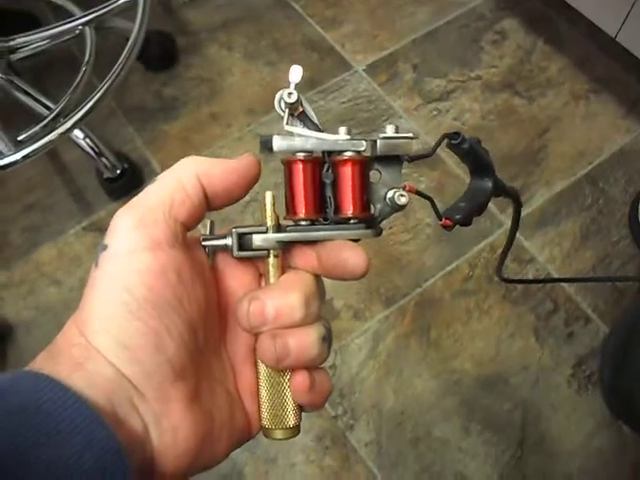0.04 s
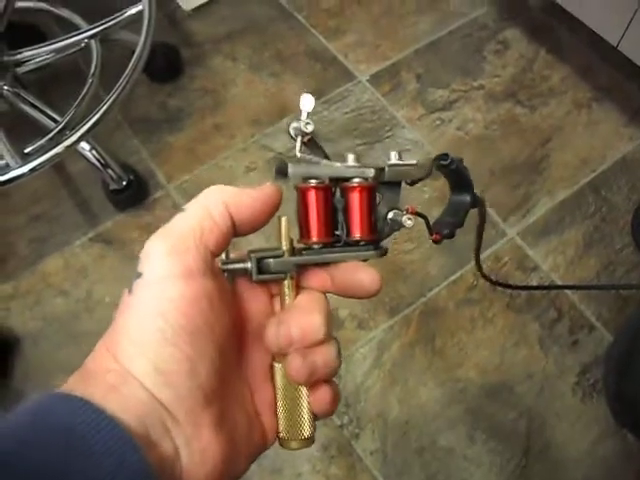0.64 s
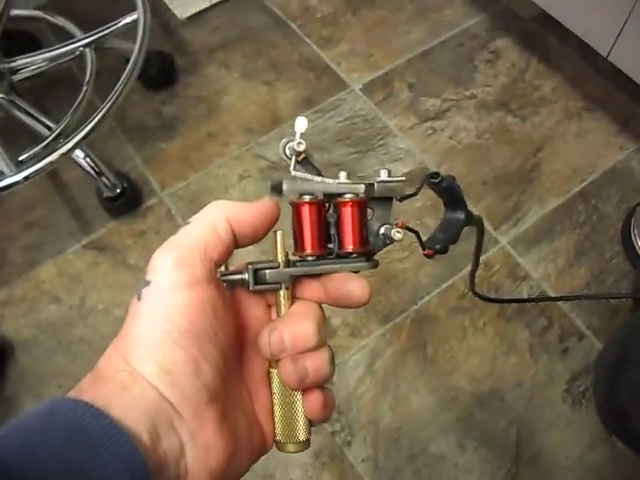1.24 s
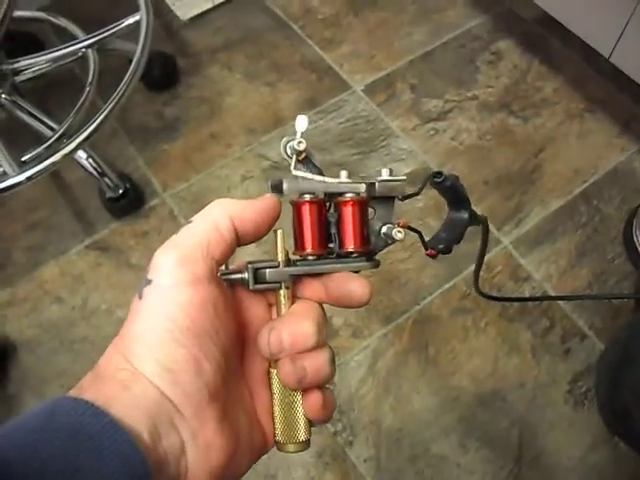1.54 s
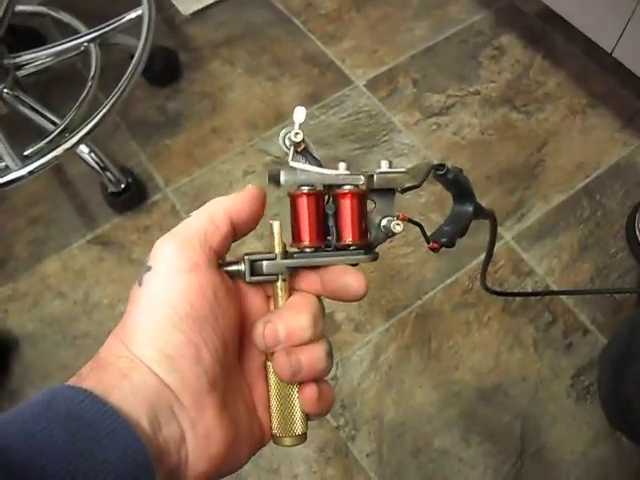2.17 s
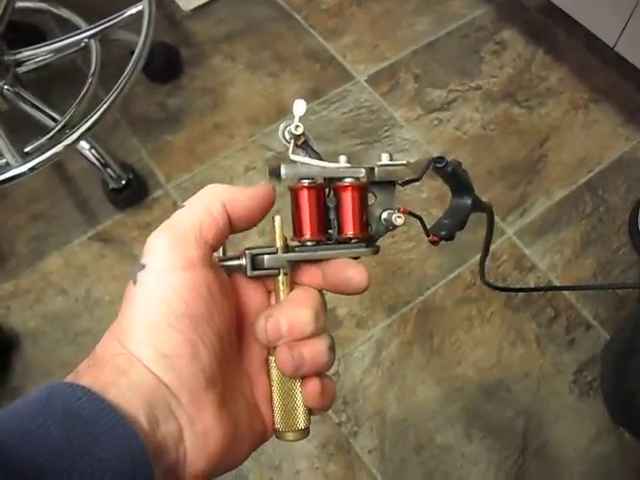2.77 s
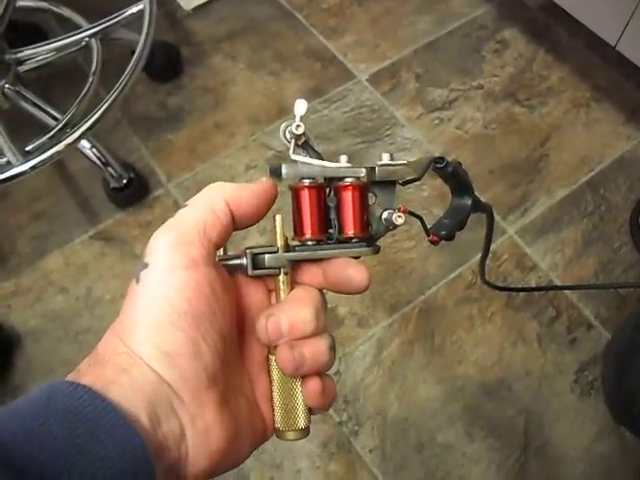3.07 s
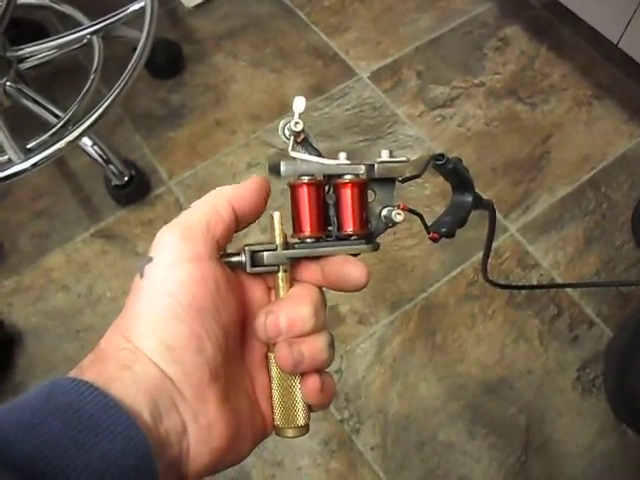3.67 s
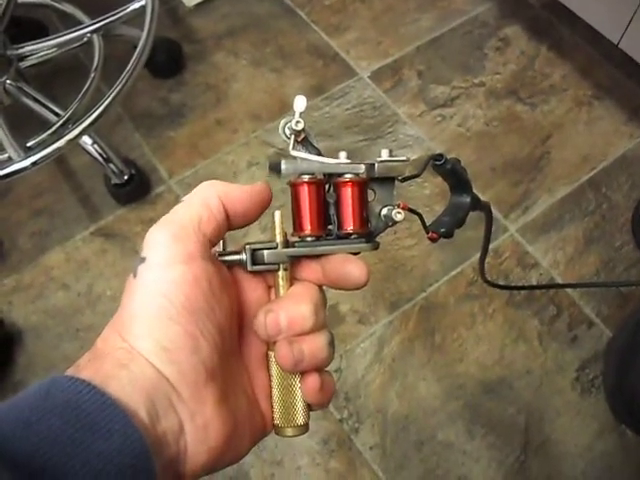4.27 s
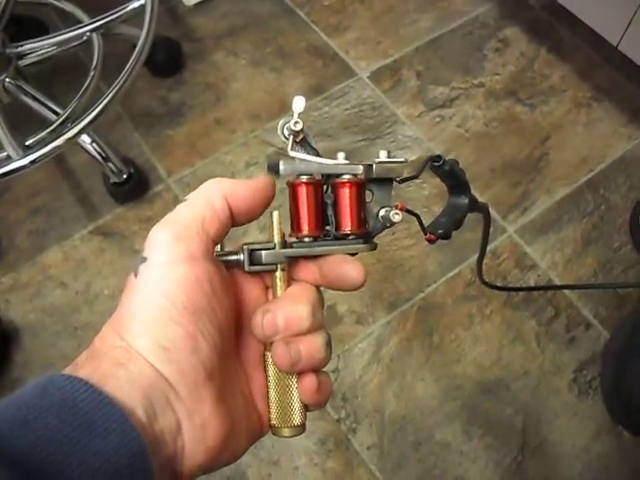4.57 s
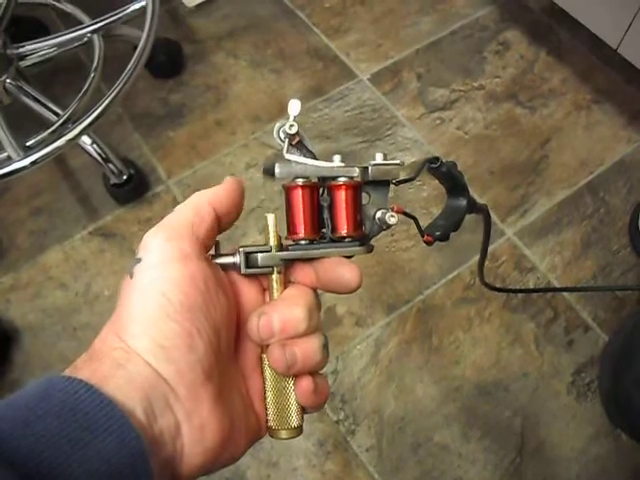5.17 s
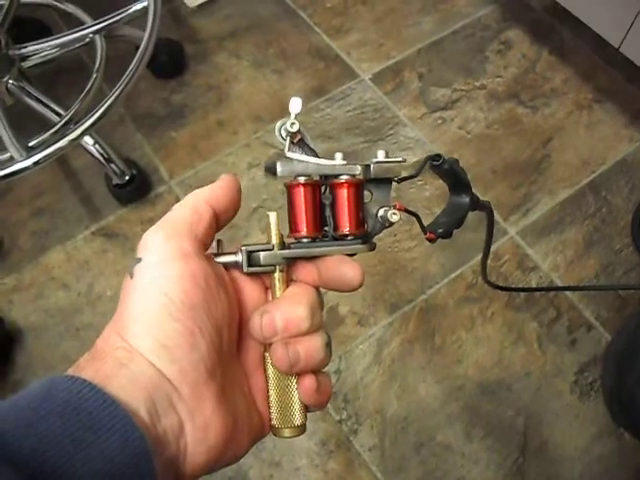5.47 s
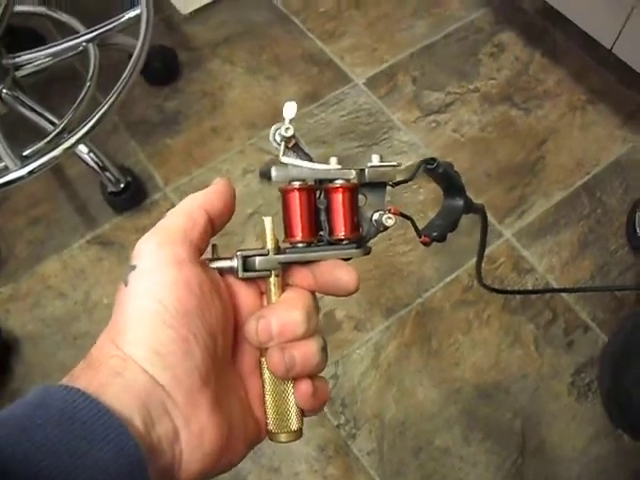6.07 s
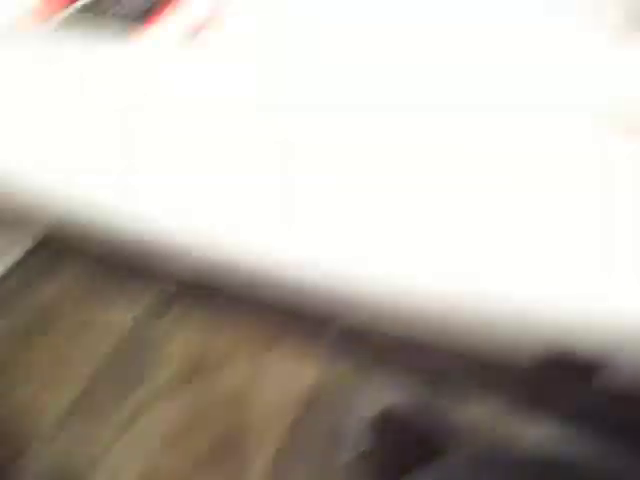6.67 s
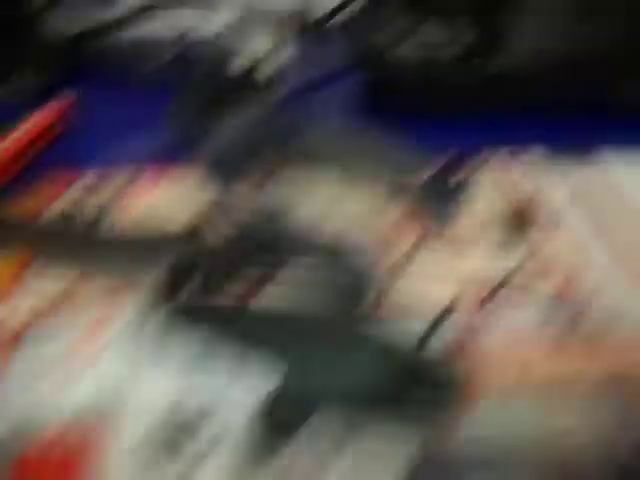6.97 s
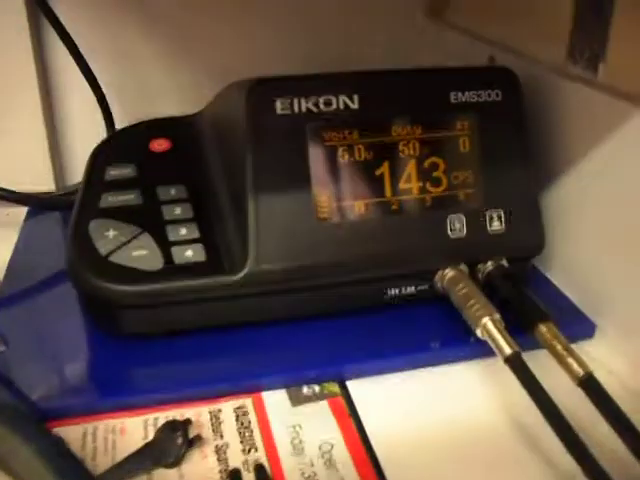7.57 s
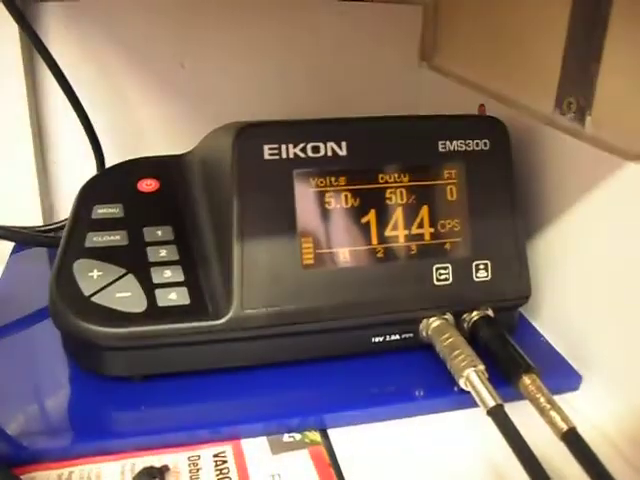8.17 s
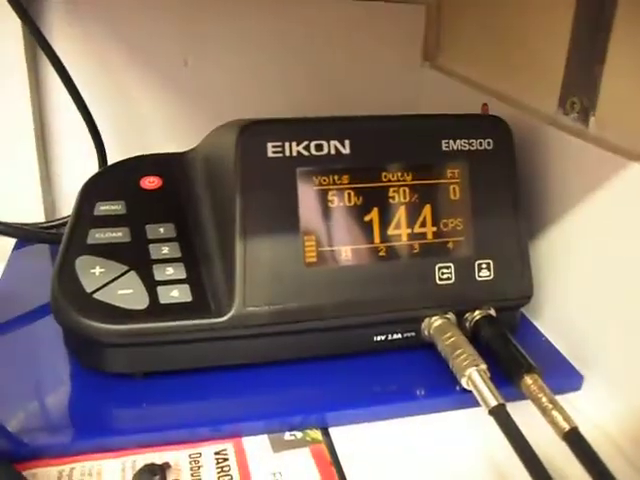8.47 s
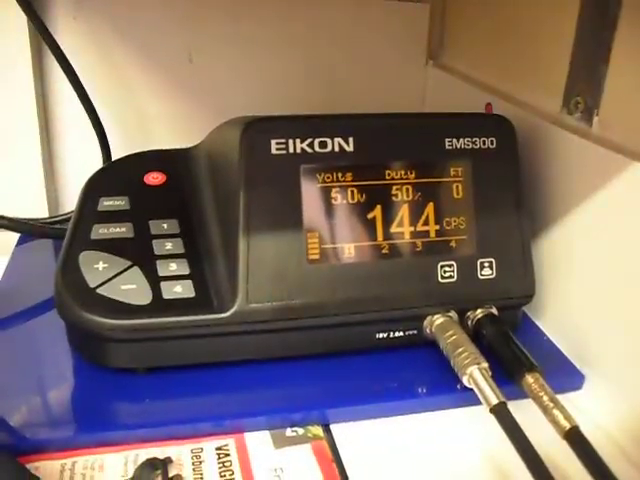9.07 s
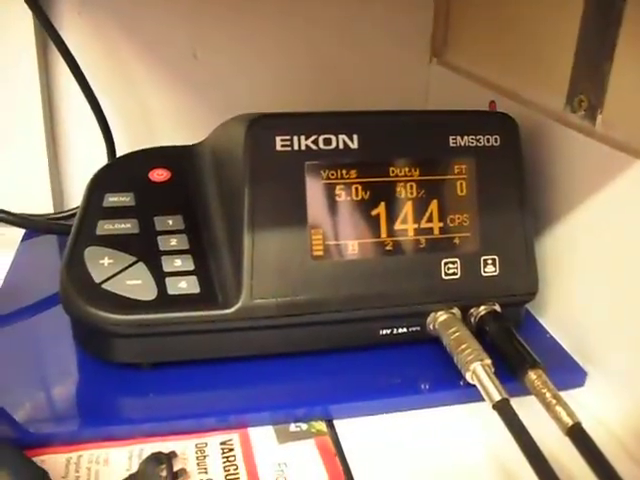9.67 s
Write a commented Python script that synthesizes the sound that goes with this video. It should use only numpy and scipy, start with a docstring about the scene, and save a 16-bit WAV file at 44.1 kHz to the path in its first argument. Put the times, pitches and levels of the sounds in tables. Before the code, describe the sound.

A coil tattoo machine buzzes close to the microphone from the start, a bright, metallic rasp of steady pitch over a soft hum, with a few tiny sputters in the first second. Three times a thumb presses on its moving bar: the buzz weakens, dips slightly in pitch and shrinks to a faint, rapid ticking, from about 1.7 to 2.1 seconds, 3.3 to 3.6 seconds and 4.8 to 5.1 seconds. Each time it snaps straight back to full strength. From about 6.3 to 7.3 seconds the microphone swings a short way off, and the tone shifts and flutters. The buzz then carries on, a little softer and less sharp, with slight sputters between 7.6 and 8.4 seconds, until the end at nearly 10 seconds. The room is small and quiet, with little echo and a faint ventilation rumble.

```python
"""In a small, quiet room, a hand-held coil tattoo machine buzzes. Its armature bar hits the coil cores
about 144 times a second; each impact excites the steel frame's resonances, and the swinging mass hums.
Three times a thumb presses on the bar, which slows until only its spring ticks on the contact screw.
Then the microphone swings away to a shelf, through shifting echoes. Ventilation rumbles underneath."""
import sys
import numpy as np
from scipy import signal
from scipy.fft import rfft, irfft, next_fast_len
from scipy.io import wavfile
from scipy.ndimage import uniform_filter1d, map_coordinates

SR = 44100
rng = np.random.default_rng(int(sys.argv[2]) if len(sys.argv) > 2 else 0)


def store_pcm(level_fs):
    """Save levels as 16-bit WAV."""
    pcm = np.round(np.clip(level_fs, -1, 1) * 32767).astype(np.int16)
    wavfile.write(sys.argv[1], SR, np.atleast_2d(pcm).T)


N = 433062

# Stroke rate of the free bar, one list for each run between presses: t/s, f/Hz
FREE_RATE = [
    [(0.0, 144.4), (0.612, 143.8), (0.646, 144.2), (1.53, 144.2)],
    [(2.15, 144.2), (2.17, 143.9), (3.05, 144.2)],
    [(3.7, 144.2), (4.58, 144.2)],
    [(5.1, 144.2), (6.64, 144.1), (9.8, 144.5)],
]
# Base level of the buzz in the same runs: t/s, strike level/dB, treble level/dB
FREE_LEVEL = [
    [(0.03, -40, -47), (0.39, -41, -47), (0.896, -38, -45), (1.054, -37, -48), (1.52, -39, -47)],
    [(2.15, -40, -46), (2.276, -38, -48), (2.606, -40, -45), (3.05, -40, -45)],
    [(3.7, -41, -44), (4.58, -40, -45)],
    [(5.1, -40, -45), (5.19, -41, -45), (6.19, -39, -46), (6.57, -43, -49), (7.34, -42, -55),
     (9.8, -42, -54)],
]
# Thumb presses: touch t/s, lean t/s, stall t/s, release t/s, held stroke f/Hz, treble flutter level/dB
PRESSES = [(1.54, 1.705, 1.819, 2.09, 140.8, 12), (3.06, 3.255, 3.377, 3.641, 138.9, 0),
           (4.59, 4.805, 4.876, 5.051, 140.5, 8)]
# Sputters of the contact: t/s, half length/s, roughness/1
SPUTTERS = [(.28, .025, .2), (.42, 0.044, .3), (.55, .03, 0.3), (.75, .025, 0.28), (6.15, .03, .2),
            (7.62, .06, 0.22), (7.88, .035, .5), (7.98, .02, .4), (8.33, .05, 0.64)]
# Microphone path: t/s, distance moved/m, place/1 (0 first, 1 tilted, 2 settled grip, 3 swing, 4 shelf)
MIC_PATH = [(0, 0.02, 0), (.24, .002, 0), (.55, 0.087, 0.43), (.8, .14, 1), (1.7, .15, 1.24),
            (2.7, 0.15, 2), (6.1, 0.13, 2), (6.3, 0.16, 2.03), (6.5, 0.3, 2.5), (6.7, 0.43, 3.5),
            (6.9, 0.598, 3.5), (7.2, 0.74, 4), (7.5, 0.76, 4), (9.82, .785, 4)]
# Spectra that the frame radiates to those five places: f/Hz, relative level/dB
FIRST_TONE = [(2250, -47), (2450, -23), (3050, -4), (3400, -19.5), (4000, -19.5), (4800, -7), (5350, 1),
              (5900, -19), (7000, -10), (8000, -21), (9300, -26), (10400, -33), (11100, -30), (12100, -55)]
TILTED_TONE = [(2250, -49.5), (2450, -17), (3100, -23.5), (3900, -17.5), (4700, -6), (5350, -1),
               (5900, -7.5), (7100, -15), (8300, -11), (10400, -19.5), (11100, -30), (12100, -38)]
HELD_TONE = [(2250, -49), (2450, -12.5), (2750, -14.5), (3100, -12), (3350, -16.5), (3950, -11), (4750, -4),
             (5350, 0), (5900, -5.5), (7050, -12), (7950, -7), (9300, -14), (10400, -16.5), (12100, -38)]
SWING_TONE = [(1500, -36), (1900, -16), (2500, -12.5), (3000, -3.5), (3500, -11), (4100, -7.5),
              (4800, -1.5), (5400, -3.5), (6000, -13), (7000, -11), (9500, -17), (10500, -19), (12100, -39)]
SHELF_TONE = [(2250, -49), (2450, -23), (3050, -10), (3650, -18), (4100, -13.5), (4850, -0.5),
              (5300, -16.5), (5950, -26), (6500, -18), (7600, -22.5), (8450, -17.5), (9000, -23.5),
              (10300, -24.5), (11100, -37), (12100, -51)]
# Spectra of the frame under the thumb and of the spring on the screw: f/Hz, relative level/dB
LEANING_TONE = [(2250, -46), (2700, -18), (3050, -16), (3500, -16.5), (4700, -3), (5350, -1), (6000, -12),
                (6700, -6.5), (7200, -15), (8300, -10.5), (10400, -13), (12100, -36)]
SPRING_TONE = [(2200, -28), (3000, -11.5), (3750, 3.5), (4400, -2.5), (5300, -8.5), (6300, -7), (7500, -14),
               (8200, 0), (8800, -9), (9600, -22), (11000, -42), (12500, -57)]
# Rebounds and near reflections after each strike: delay/ms, gain/1
FIRST_ECHO = [(0.487, 0.75), (1.162, -0.22), (2.15, 0.51), (2.249, 0.36), (3.271, -0.17), (4.55, 0.29)]
HELD_ECHO = [(0.821, -0.14), (0.945, 0.051), (1.286, 0.21), (1.451, -0.12), (1.733, 0.16), (2.048, 0.16),
             (2.266, 0.29), (2.44, -0.19)]
SHELF_ECHO = [(0.957, 0.19), (1.688, 0.43), (1.951, -0.29), (3.002, -0.34), (3.335, -0.21), (4.103, 0.12),
              (4.254, -0.2), (4.458, 0.11)]
# How far the frame's bending waves fall out of step: f/Hz, phase spread/rad
PHASE_SPREAD = [(2400, 0.85), (4000, 0.67), (5400, 0.44), (6500, .62), (8000, 1.45), (9800, 1.3),
                (11000, .2)]
# Hum of the swinging bar and frame: harmonic number/1, relative level/dB
HELD_HUM = [(1, -15.5), (2, 0.5), (3, -11.5), (4, -11), (5, -8.5), (6, -11.5), (7, 1), (8, -14.5), (9, 2),
            (10, -12), (11, -8), (12, -4), (13, -12), (14, -1), (15, 1), (16, -4.5)]
SHELF_HUM = [(1, -11), (2, -13), (3, -15.5), (4, -19.5), (5, -15), (6, -1), (7, -4), (8, -8.5), (9, -16),
             (10, -1), (11, -8), (12, -28), (13, -13), (14, -2.5), (15, -0.5), (16, 2.5)]
PRESSED_HUM = [(1, -2), (2, -1.5), (7, -11), (8, -8.5), (10, -9), (13, -7), (14, -5), (15, -7)]
# Reverberation time of the room: f/Hz, T60/s
ROOM_T60 = [(300, 0.23), (3000, 0.26), (6000, 0.32), (12000, 0.094)]
# Noise spectrum of the room: f/Hz, relative level/dB
ROOM_NOISE = [(12, -15.5), (27, 0.5), (40, -13.5), (70, -13), (120, -18.5), (250, -22.5), (500, -26),
              (1000, -28), (2000, -31), (5000, -31.5), (10000, -35), (12500, -58)]

TOUCH_S, LEAN_S, STALL_S, RELEASE_S = .1, .055, .028, .021  # how long each stage of a press takes to come in
SETTLE_AFTER_S, SETTLE_S, LIFT_S = .05, .045, .032  # the stalled bar settles, then stirs before release
TOUCH_DB, LEAN_DB, STALL_DB, SETTLE_DB = -1.5, -4.5, -14.5, -12  # what each stage takes from the strike
TOUCH_TREBLE_DB, LEAN_TREBLE_DB, SETTLE_TREBLE_DB = -1.8, -8.5, -13
FLUTTER_AT, FLUTTER_WIDTH = .7, .2  # the spring's swell: centre and half width as shares of the stall
FLUTTER_STRIKE = .65  # share of the flutter level that enters the strike band
GRIP_HZ = .35  # a light touch stiffens the spring and speeds the bar
DRAG_S, DRAG_HZ = .11, 4.5  # the leaning thumb slows the bar this fast and this far
STUMBLE_AFTER_S, STUMBLE_S, STUMBLE_HZ = .035, .035, 5.2  # further dip once the bar misses the cores
FLARE_DB, FLARE_S = 2.2, .025  # the bar strikes harder as the thumb begins to lean
WANDER_PER_S, WANDER_HZ, WANDER_DB = 10, .04, .12  # the contact is never quite even
SPUTTER_SAG_HZ = 1.2  # stroke rate lost at full roughness
STRIKE_GAIN_DB, SHELF_TREBLE_DB = .1, 1.5
RIPPLE_DB, RIPPLE_M = .7, .018  # standing waves: depth, spacing
SOUND_SPEED_M_S, TOP_HZ = 343, 12500


def armature(cycles, thumb, place):
    """Impact excitation: the bar's blows on the cores ring the frame; a stall leaves only the spring."""
    rough = np.clip(0.33 * thumb + sputtering(), 0, 1)
    even = blows(cycles, jitter_us=0.97, scatter_db=0.25)
    uneven = blows(cycles, jitter_us=25, scatter_db=0.5)
    strikes = dispersed((1 - rough) * even + rough * uneven, lead_ms=0.23)
    views = [(FIRST_TONE, FIRST_ECHO), (TILTED_TONE, HELD_ECHO), (HELD_TONE, HELD_ECHO),
             (SWING_TONE, HELD_ECHO), (SHELF_TONE, SHELF_ECHO)]
    free = sum(share * unit(ring(strikes, *view)) for share, view in zip(shares(place), views))
    loaded = unit(ring(strikes, LEANING_TONE, HELD_ECHO)) - bar_ring(strikes, thumb)
    leaning = np.clip(1.1 * thumb, 0, 1)
    clack = (1 - leaning) * free + leaning * loaded
    stalled = thumb ** 4
    return (1 - stalled) * clack + stalled * spring_tick(strikes, cycles)


def drive():
    """Damping of a driven oscillator: the thumb touches, leans on, stalls and releases the bar."""
    rate, = curves(np.concatenate(FREE_RATE))
    strike_db, treble_db = curves(np.concatenate(FREE_LEVEL))
    force_db = WANDER_DB * wobble(WANDER_PER_S)
    rate = rate + WANDER_HZ * wobble(WANDER_PER_S) - SPUTTER_SAG_HZ * sputtering() ** 2
    strike_db += STRIKE_GAIN_DB + force_db
    treble_db += force_db
    thumb = np.zeros(N)
    for touch_s, lean_s, stall_s, release_s, held_hz, flutter_db in PRESSES:
        held = (1 - ramp(release_s - RELEASE_S * 2 / 3, RELEASE_S)) ** 2
        touch = held * ramp(touch_s, TOUCH_S)
        lean = held * ramp(lean_s, LEAN_S)
        drag = held * ramp(lean_s, DRAG_S)
        stall = held * ramp(stall_s, STALL_S)
        settle = ramp(stall_s + SETTLE_AFTER_S, SETTLE_S) * (1 - ramp(release_s - LIFT_S, LIFT_S))
        length = release_s - stall_s
        flutter = flutter_db * swell(stall_s + FLUTTER_AT * length, FLUTTER_WIDTH * length)
        stumble = STUMBLE_HZ * swell(stall_s + STUMBLE_AFTER_S, STUMBLE_S)
        rate = (1 - stall) * (rate + GRIP_HZ * touch - DRAG_HZ * drag) + stall * (held_hz - stumble)
        thumb += (1 - stall) * (.05 * touch + .3 * lean + .3 * drag) + .98 * stall
        strike_db += TOUCH_DB * touch + LEAN_DB * lean + STALL_DB * stall + SETTLE_DB * settle
        strike_db += FLUTTER_STRIKE * flutter + FLARE_DB * swell(lean_s, FLARE_S)
        treble_db += TOUCH_TREBLE_DB * touch + LEAN_TREBLE_DB * drag + SETTLE_TREBLE_DB * settle + flutter
    return rate, np.clip(thumb, 0, 1), strike_db, treble_db


def strokes(rate):
    """Phase, in strokes, is the integral of rate; the bar starts a fresh cycle at each release."""
    cycles = np.cumsum(rate) / SR
    for _, _, _, release_s, _, _ in PRESSES:
        lag = (cycles[round(release_s * SR)] + .5) % 1 - .5
        cycles = cycles - lag * ramp(release_s - LIFT_S, LIFT_S)
    return cycles


def sputtering():
    """Intermittent contact: how unevenly the circuit closes, from 0 to 1."""
    return sum(size * swell(s, half) for s, half, size in SPUTTERS)


def blows(cycles, jitter_us, scatter_db):
    """A quasi-periodic impulse train: scatter in time and force puts noise between the harmonics."""
    at = np.interp(np.arange(1, int(cycles[-1])), cycles, np.arange(N))
    chance = rng.standard_normal((len(at), 2))
    at = at + chance[:, 0] * jitter_us * SR / 1e6
    taps = at.astype(int)[:, None] + np.arange(-7, 9)
    offset = taps - at[:, None]
    pulses = np.sinc(offset) * np.sinc(offset / 8)  # a windowed sinc can fall between samples
    force = amp(scatter_db * chance[:, 1:])
    return np.bincount(taps.ravel(), (pulses * force).ravel(), N)[:N]


def dispersed(x, lead_ms):
    """Dispersion of bending waves: treble arrives first, and scattering in the frame draws it out."""
    def response(hz):
        knots = rng.standard_normal(SR // 300 + 4)
        scatter = map_coordinates(knots, [hz / 170])
        chirp = np.pi * lead_ms / 1000 * (hz - 5000) ** 2 / 5000
        return np.exp(1j * (chirp + along(PHASE_SPREAD, hz) * scatter))
    return filtered(x, response)


def ring(x, tone, echoes=(), size=4096):
    """Resonance: x excites a minimum-phase body with this spectrum, followed by short echoes."""
    hz = np.fft.rfftfreq(size, 1 / SR)
    cepstrum = irfft(np.log(amp(along(tone, hz))))
    cepstrum[1:size // 2] *= 2  # folding the cepstrum makes the response causal
    cepstrum[size // 2 + 1:] = 0
    paths = 1 + sum(gain * np.exp(-2j * np.pi * hz * ms / 1000) for ms, gain in echoes)
    impulse_response = irfft(np.exp(rfft(cepstrum)) * paths)[:size // 2]
    return signal.oaconvolve(x, impulse_response)[:N]


def bar_ring(strikes, thumb, light_hz=3350, loaded_hz=2950, q=14):
    """Mass loading: under the thumb the bar's resonance gives way to a lower one."""
    load = np.clip((thumb - .25) / .4, 0, 1)
    light, heavy = (unit(signal.lfilter(*signal.iirpeak(hz, q, fs=SR), strikes))
                    for hz in (light_hz, loaded_hz))
    return amp(-13) * ((1 - load) * light + load * heavy)


def spring_tick(strikes, cycles):
    """Impact and friction: the front spring ticks and scrapes on the contact screw once a cycle."""
    scrape = rng.standard_normal(N) * (1 + np.cos(2 * np.pi * cycles))
    return unit(ring(unit(strikes) + 0.26 * unit(scrape), SPRING_TONE, HELD_ECHO))


def at_levels(x, strike_db, treble_db, crossover_hz=7000):
    """Amplitude envelopes: the main ring and its treble are each levelled, then given their own level."""
    def steady(band):
        power = uniform_filter1d(uniform_filter1d(band * band, size=612), size=612)  # about two strokes
        return band / np.sqrt(np.abs(power) + 1e-12)
    low = filtered(x, lambda hz: 1 / (1 + (hz / crossover_hz) ** 24))
    return amp(strike_db) * steady(low) + amp(treble_db) * steady(x - low)


def hum(cycles, thumb, place, lag_s=.018):
    """Forced vibration: the swinging mass shakes the frame at harmonics of the stroke rate."""
    def harmonics(orders, size=4096):
        turn = np.arange(size) / size
        wave = unit(sum(amp(db) * np.sin(2 * np.pi * (round(k) * turn + rng.random()))
                        for k, db in orders))
        return wave[(cycles * size).astype(int) % size]
    pole = np.exp(-1 / (lag_s * SR))
    thumb = signal.lfilter([1 - pole], [1, -pole], thumb)  # the low swing lags behind the thumb
    away = np.clip((place - 2) / 1.85, 0, 1)
    held = np.sqrt(1 - away) * amp(-58.0) * harmonics(HELD_HUM)
    shelf = np.sqrt(away) * amp(-64.5) * harmonics(SHELF_HUM)
    pressed = np.clip(14 * thumb, 0, 1) * amp(-67.5) * harmonics(PRESSED_HUM)
    return (1 - thumb) * (held + shelf) + pressed


def knocks(mode_hz=1015, rise_s=.008, t60_s=.16):
    """Damped free vibration: the first stroke after each press kicks the frame's low mode."""
    t = np.arange(SR // 4) / SR
    envelope = amp(-56 - 60 * t / t60_s) * (1 - np.exp(-t / rise_s))
    knock = envelope * np.sin(2 * np.pi * mode_hz * t)
    out = np.zeros(N)
    for _, _, _, release_s, _, _ in PRESSES:
        out[round(release_s * SR):][:len(t)] += knock
    return out


def reflections(x, metres, count=8):
    """Interference: echo paths off floor and furniture change with movement, so the overtones flutter."""
    out = np.zeros(N)
    fine = signal.resample_poly(x, up=4, down=1)
    grid = np.linspace(0, N, len(fine), endpoint=False)
    for slant, delay_s in zip(np.linspace(-1, 1, count), rng.uniform(.006, .02, count)):
        emitted = np.arange(N) - SR * (delay_s + slant * metres / SOUND_SPEED_M_S)
        out += np.interp(emitted, grid, fine)
    return out / np.sqrt(count)


def reverberation(x):
    """Absorption: the room's diffuse field decays exponentially, the highest treble first."""
    hz, t, spectra = signal.stft(rng.standard_normal(SR // 2), SR, nperseg=256)
    decay = amp(-60 * t / along(ROOM_T60, hz)[:, None])
    tail = signal.istft(spectra * decay, SR, nperseg=256)[1]
    return signal.oaconvolve(x, tail / np.linalg.norm(tail))[:N]


def room_tone(drone_hz=52):
    """Broadband and narrowband noise: ventilation rumble, faint hiss and a low drone."""
    air = unit(filtered(rng.standard_normal(N), lambda hz: amp(along(ROOM_NOISE, hz))))
    drone = unit(filtered(rng.standard_normal(N), lambda hz: 1 / (1 + ((hz - drone_hz) / 4) ** 2)))
    return amp(-62.5) * air + amp(-69.5) * drone


def amp(db):
    """Amplitude ratio of a level in decibels."""
    return 10 ** (np.asarray(db) / 20)


def unit(x):
    """Normalisation to rms 1."""
    return x / np.sqrt(np.mean(x ** 2) + 1e-20)


def along(points, hz):
    """Interpolation of (f/Hz, value) points on a logarithmic frequency axis."""
    f, v = np.transpose(points)
    return np.interp(np.log(hz + 1), np.log(f), v)


def curves(rows):
    """Linear interpolation of each column after t/s, one value per sample."""
    times, *columns = np.transpose(rows)
    return [np.interp(np.arange(N) / SR, times, column) for column in columns]


def filtered(x, response):
    """Linear filtering: the spectrum of x times a frequency response."""
    size = next_fast_len(N + SR // 2, real=True)
    return irfft(rfft(x, size) * response(np.fft.rfftfreq(size, 1 / SR)), size)[:N]


def shares(place):
    """Equal-power crossfade: the gains of the five places along the path."""
    return [np.sqrt(np.clip(1 - np.abs(place - k), 0, 1)) for k in range(5)]


def ramp(start_s, length_s):
    """Linear rise from 0 to 1."""
    return np.clip((np.arange(N) / SR - start_s) / length_s, 0, 1)


def swell(centre_s, half_s):
    """Bell-shaped envelope of height 1."""
    u = np.minimum(((np.arange(N) / SR - centre_s) / half_s) ** 2, 9)
    return np.exp(-u * np.sqrt(u))


def wobble(knots_per_s):
    """Slow random modulation: a spline through Gaussian knots."""
    knots = rng.standard_normal(512)
    at = np.linspace(0, N, 4096)
    return np.interp(np.arange(N), at, map_coordinates(knots, [at * knots_per_s / SR], mode="mirror"))


def scene():
    """Superposition of the machine, its echoes and the room's noise at the moving microphone."""
    rate, thumb, strike_db, treble_db = drive()
    cycles = strokes(rate)
    metres, place = curves(MIC_PATH)
    sway_m = 0.0034 * wobble(3)  # the hands are never quite still
    clack = armature(cycles, thumb, place)
    # in mid-swing the microphone points away, hears more of the echoes and crosses standing waves
    turned, at_shelf = shares(place)[3:]
    clack = clack + (amp(-13) + amp(-3.5) * turned) * reflections(clack, metres + sway_m)
    standing_waves = map_coordinates(rng.standard_normal(128), [metres / RIPPLE_M], mode="mirror")
    ripple_db = RIPPLE_DB * turned * standing_waves
    buzz = at_levels(clack, strike_db + ripple_db, treble_db + ripple_db + SHELF_TREBLE_DB * at_shelf)
    tail = amp(-18) * reverberation(buzz)
    return (buzz + tail + hum(cycles, thumb, place) + knocks() + room_tone())[None]


def record(dry):
    """Band limiting: an ideal low-pass filter passes nothing above TOP_HZ."""
    return filtered(dry[0], lambda hz: hz < TOP_HZ)[None]


dry = scene()
out = record(dry)
store_pcm(out)
```